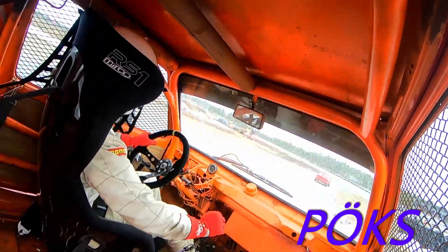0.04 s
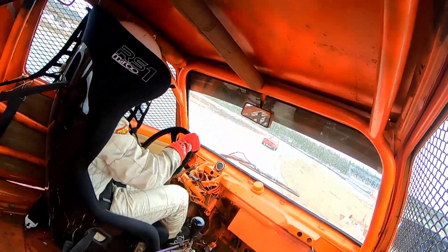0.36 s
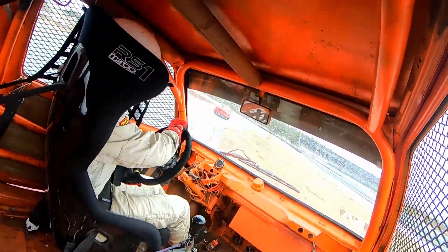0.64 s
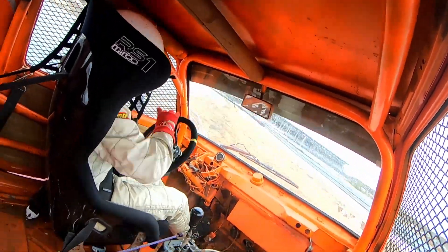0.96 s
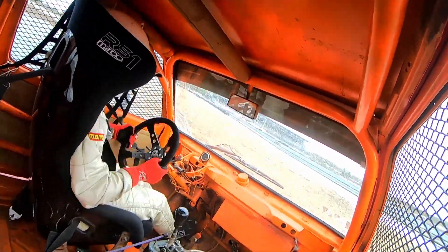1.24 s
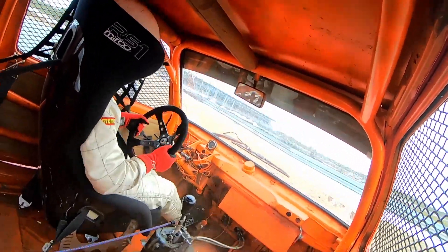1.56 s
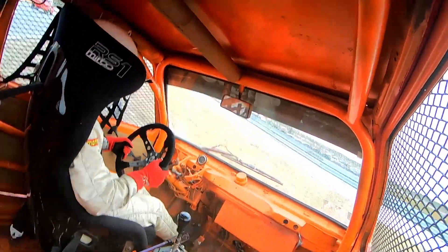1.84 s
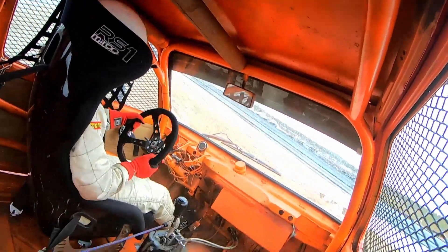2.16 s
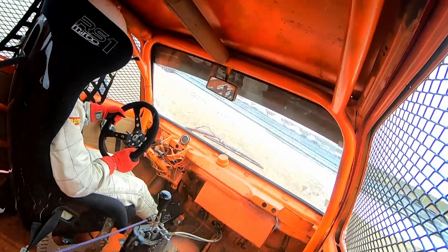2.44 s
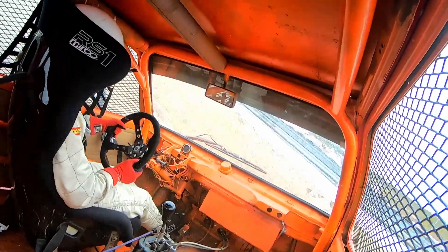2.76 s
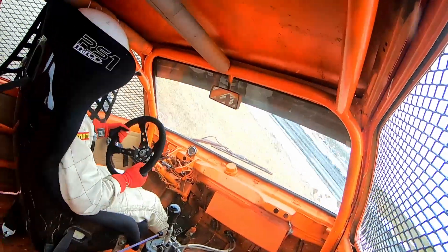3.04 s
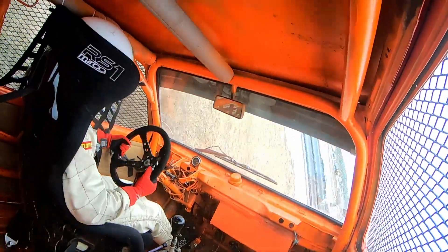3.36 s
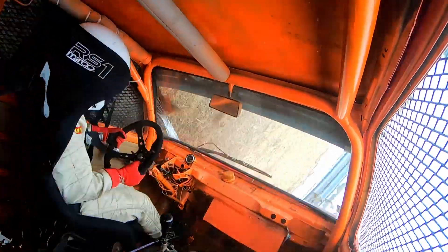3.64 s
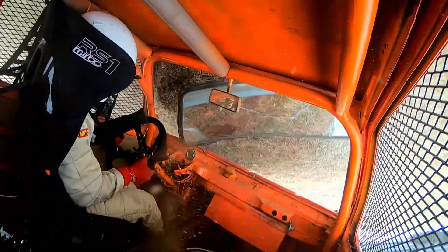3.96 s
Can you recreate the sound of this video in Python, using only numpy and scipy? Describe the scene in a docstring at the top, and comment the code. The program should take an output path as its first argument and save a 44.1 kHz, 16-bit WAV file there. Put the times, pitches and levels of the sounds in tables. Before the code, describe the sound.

A race car engine drones and sinks in pitch, heard inside the bare metal cabin. Tyres squeal briefly and a second engine fades, then gravel sprays the rumbling body, ending in a crunch of dirt and a boom.

```python
"""A race car's engine, heard inside the stripped shell as the car slides off the track and starts to tip.
Its note follows the firing rate and sinks as the car slows; a second engine drones nearby.
Stick-slip friction makes the tyres squeal briefly. Then the wheels plough loose dirt: the shell
rumbles and booms, gravel and stones set the panels ringing, and the body digs in."""
import sys
import numpy as np
from scipy import signal
from scipy.fft import rfft, irfft
from scipy.io import wavfile

SR = 44100
rng = np.random.default_rng(int(sys.argv[2]) if len(sys.argv) > 2 else 0)


def dump(signal):
    """Clip the signal to [-1, 1] and save it as 16-bit WAV at the path in sys.argv[1]."""
    limited = np.clip(np.atleast_2d(signal).T, -1, 1)
    pcm = np.round(limited * 32767).astype(np.int16)
    wavfile.write(sys.argv[1], SR, pcm)


N = 176400
T = np.arange(N) / SR

# Cylinder firing: time_s, rate_hz
FIRING_RATE = [(0, 193.7), (.22, 204.1), (.42, 174.7), (1.05, 132.4), (1.62, 100.8), (1.97, 98.55),
               (2.15, 92), (2.4, 84.1), (2.66, 72.86), (3, 75.2), (3.5, 72.18)]
# Engine fundamental: time_s, level_db
FUNDAMENTAL = [(0, -13.5), (.18, -10), (.36, -15), (.52, -8), (.62, -13), (.95, -11), (.99, -22),
               (1.7, -24), (1.92, -17), (2.12, -20), (2.45, -28.5), (2.85, -16.5), (3.3, -17.5), (3.6, -29)]
# Its octave: time_s, level_db
OCTAVE = [(0, -28.5), (1.5, -27), (1.64, -11.5), (1.97, -21.5), (2.14, -12.5), (2.3, -21.5), (2.56, -12.5),
          (2.85, -20.5), (3.5, -18.5), (4, -26)]
# Upper engine partials: firing_multiple, gain_db
OVERTONES = [(2.25, -6.5), (2.75, -0.5), (3, -1), (4, -3), (5, -9.5), (6.5, -9.5)]
# Their shared envelope: time_s, gain_db
RASP = [(0, -24), (.2, -25), (.28, -31.5), (1.2, -38), (2, -29.5), (4, -25)]
# Second engine: time_s, pitch_hz, level_db
RIVAL = [(0, 223.6, -20.5), (.5, 219.9, -21), (.7, 212.2, -27.5), (1.08, 206, -12.5), (1.22, 200.2, -21),
         (1.6, 199.2, -49)]
# Rolling noise on the hard track: time_s, level_db
ROAD = [(0, -20), (.2, -26), (.44, -23), (.55, -24), (1.1, -25.5), (2.5, -35)]
# Its spectrum: frequency_hz, gain_db
ROAD_SPECTRUM = [(290, -6), (650, 0.5), (1000, -5), (2600, -15), (5200, -30), (9500, -41.5)]
# Chassis rumble: time_s, level_db
RUMBLE = [(0, -29), (.75, -36), (1.02, -24), (1.5, -20), (1.7, -29), (1.94, -18.5), (2.4, -29), (2.85, -25),
          (3.6, -16.5), (4, -21)]
# Its spectrum: frequency_hz, gain_db
RUMBLE_SPECTRUM = [(20, -1), (36, 1), (65, 4), (120, 1), (250, -71)]
# Roar of the shell: time_s, level_db
ROAR = [(0, -22.5), (1.02, -22), (1.4, -15.5), (1.7, -16.5), (2.05, -13), (3, -18.5), (3.62, -21),
        (3.72, -15.5), (4, -17)]
# Its spectrum: frequency_hz, gain_db
ROAR_SPECTRUM = [(90, -11), (155, 2.5), (215, -1), (285, -4.5), (400, -7.5), (600, -12), (1000, -20),
                 (1400, -27), (3000, -37.5)]
# Gravel spray: time_s, gain_db
SPRAY = [(0, -37), (.44, -36), (.54, -57), (.9, -37), (1.095, -36), (1.12, -27), (1.35, -22), (1.52, -28),
         (1.7, -27), (1.82, -24.5), (1.9, -28), (2.12, -36), (2.5, -28.5), (2.8, -34), (3.05, -33.5),
         (3.36, -43), (3.61, -39), (3.69, -28), (3.8, -28.5), (3.85, -33.5), (4, -47.5)]
# Its spectrum: frequency_hz, gain_db
SPRAY_SPECTRUM = [(800, 1), (1700, 6.5), (3100, 2), (6400, -7.5), (8400, -12.5), (10000, -23),
                  (12800, -24.5), (15400, -39)]
# Panel modes rung by the spray: centre_hz, width_hz, gain_db
PANEL_MODES = [(777, 140, -4.5), (1378, 210, -11.5), (2770, 980, -15.5)]
# Tyre squeal: time_s, pitch_hz, level_db
SQUEAL = [(.25, 650, -32.5), (.42, 637, -27), (.56, 630, -29.5), (.66, 660, -22), (.72, 692, -17.5),
          (.77, 665, -25.5), (.85, 661, -23), (.9, 663, -36)]
# Stones and clods striking the body: start_s, level_db, ring_hz
STONES = [(.932, -31.5, 5530), (1.058, -30.5, 5533), (1.181, -32, 1704), (1.452, -25, 2610),
          (1.609, -24, 5000), (1.823, -20, 1500), (1.849, -30, 4400), (2.414, -27, 1994),
          (2.484, -29.5, 3600), (2.649, -22.5, 2712), (2.862, -26, 2806), (3.04, -33.5, 3305),
          (3.163, -26.5, 2920), (3.282, -27.5, 1078), (3.404, -31, 3000), (3.501, -33.5, 4916),
          (3.684, -20.5, 2883), (3.738, -19.5, 1405), (3.783, -25, 3200)]
# Bumps booming through the shell: start_s, level_db, pitch_hz
BUMPS = [(1.81, -17, 220), (1.96, -15.5, 249), (2.72, -15.5, 267.2), (2.78, -17.5, 285.4), (3.71, -25, 211),
         (3.921, -11, 187)]
# The body digging into dirt: time_s, level_db
DIG = [(3.53, -48), (3.555, -20.5), (3.6, -25.5), (3.67, -22.5), (3.705, -15), (3.79, -18), (3.9, -15.5),
       (4, -21.5)]
# Its spectrum: frequency_hz, gain_db
DIG_SPECTRUM = [(220, 0), (460, 10.5), (720, 6.5), (1150, -3), (1500, -4.5), (2000, -22), (4000, -23)]

BAND_LIMIT_HZ = 15500


def amp(db):
    return 10 ** (np.asarray(db) / 20)


def unit(x):
    return x / np.sqrt(np.mean(x ** 2) + 1e-20)


def curve(rows, column=1):
    """Linear interpolation of one table column in time."""
    rows = np.array(rows)
    return np.interp(T, rows[:, 0], rows[:, column])


def envelope(rows, column=1):
    """Amplitude envelope from a dB column, silent before its first row."""
    return amp(curve(rows, column)) * (T >= rows[0][0])


def wobble(rate_hz):
    """Low-pass noise of unit RMS: a random fluctuation."""
    hz = np.fft.rfftfreq(N, 1 / SR)
    return unit(irfft(rfft(rng.standard_normal(N)) / (1 + (hz / rate_hz) ** 4), N))


def colour(x, spectrum):
    """Minimum-phase filtering to a spectrum with steep skirts, at unit RMS."""
    hz = np.abs(np.fft.fftfreq(8192, 1 / SR)) + 1
    knots_hz, knots_db = np.transpose(spectrum)
    db = np.interp(np.log(hz), np.log(knots_hz), knots_db)
    db += 40 * np.log10(np.minimum(hz / knots_hz[0], 1))
    db -= 70 * np.log10(np.maximum(hz / knots_hz[-1], 1))
    log_gain = np.log(amp(np.maximum(db, -100)))
    response = np.exp(np.conj(signal.hilbert(log_gain)))
    taps = np.fft.ifft(response).real[:4096] * np.hanning(8192)[4096:]
    return unit(signal.oaconvolve(x, taps)[:len(x)])


def ring(x, hz, width_hz):
    """Forced response of a damped resonator, at unit RMS."""
    return unit(signal.lfilter(*signal.iirpeak(hz, hz / width_hz, SR), x))


def grains(per_s, spread_db):
    """Shot noise: independent impacts of random size."""
    size = amp(spread_db * np.minimum(rng.exponential(1, N), 5))
    return unit(size * rng.choice([-1., 1.], N) * (rng.random(N) < per_s / SR))


def phase(hz, jitter, rate_hz):
    """Phase as the integral of an unsteady frequency."""
    return 2 * np.pi * np.cumsum(hz * (1 + jitter * wobble(rate_hz))) / SR


def partial(angle, flutter_db, rate_hz):
    """A sinusoid under random amplitude modulation."""
    return unit(np.sin(angle) * amp(flutter_db * wobble(rate_hz)))


def engine(firing):
    """Periodic firing drives a fundamental and rough overtones; near idle the octave takes over."""
    rasp = sum(amp(db) * partial(k * firing, flutter_db=3, rate_hz=38) for k, db in OVERTONES)
    note = envelope(FUNDAMENTAL) * partial(firing, flutter_db=0.5, rate_hz=79)
    octave = envelope(OCTAVE) * partial(2 * firing, flutter_db=1, rate_hz=20)
    return note + octave + envelope(RASP) * rasp


def rival_engine():
    """A second engine, muffled to one wavering partial, fades with distance as it falls behind."""
    angle = phase(curve(RIVAL), jitter=0.013, rate_hz=18)
    return envelope(RIVAL, column=2) * partial(angle, flutter_db=3.5, rate_hz=19)


def road():
    """Rolling contact between tyre and track radiates broadband noise."""
    return envelope(ROAD) * colour(rng.standard_normal(N), ROAD_SPECTRUM)


def shell(firing, throb_depth=0.22):
    """Forced vibration: rough ground shakes chassis and steel shell; each firing modulates the roar."""
    rumble = envelope(RUMBLE) * colour(rng.standard_normal(N), RUMBLE_SPECTRUM)
    throb = 1 + throb_depth * np.cos(firing)
    roar = envelope(ROAR) * colour(rng.standard_normal(N) * throb, ROAR_SPECTRUM)
    return rumble + roar


def gravel(decay_s=0.021, dust_share=0.42, clump_db=1):
    """Random impacts of grit and dust excite panel modes; a weak spray thins to single ticks."""
    spray = envelope(SPRAY)
    density = spray / spray.max()
    hit_energy = grains(per_s=2800 * density, spread_db=4) ** 2 / np.sqrt(density)
    stored_energy = signal.lfilter([1], [1, -np.exp(-2 / (decay_s * SR))], hit_energy)
    strength = unit(np.sqrt(stored_energy)) + dust_share
    drive = unit(strength * rng.standard_normal(N) * amp(clump_db * wobble(rate_hz=28)))
    panels = sum(amp(db) * ring(ring(drive, hz, width), hz, 2 * width) for hz, width, db in PANEL_MODES)
    return spray * (colour(drive, SPRAY_SPECTRUM) + panels)


def tyre_squeal(octave_db=-4.5):
    """Stick-slip oscillation of rubber: the harder it squeals, the steadier its pitch."""
    level = amp(curve(SQUEAL, column=2))
    angle = phase(curve(SQUEAL), jitter=0.036 * np.sqrt(level.max() / level), rate_hz=70)
    note = partial(angle, flutter_db=1.8, rate_hz=100)
    octave = amp(octave_db) * partial(2 * angle, flutter_db=1.8, rate_hz=100)
    sliding = (T >= SQUEAL[0][0]) & (T < SQUEAL[-1][0])
    return level * sliding * (note + octave)


def stones(rise_s=0.007, t60_s=0.27, q=6, tick_db=4, fall_db_per_octave=13.5):
    """Impact excitation: each stone clatters on metal; the higher it rings, the brighter its tick."""
    out = np.zeros(N)
    for start, db, hz in STONES:
        t = T[:min(SR // 4, N - round(start * SR))]
        top_db = -fall_db_per_octave * np.log2(BAND_LIMIT_HZ / hz)
        tick = colour(rng.standard_normal(len(t)), [(hz / 2, 0), (hz, 0), (BAND_LIMIT_HZ, top_db)])
        clatter = ring(tick, hz, hz / q) + amp(tick_db) * tick
        level = np.minimum(t / rise_s, 1) * amp(db - 60 * t / t60_s)
        out[round(start * SR):][:len(t)] += unit(clatter) * level
    return out


def bumps(rise_s=0.0064, t60_s=0.53, upper_ratio=1.65, upper_db=-7.5):
    """Free vibration: knocked by ruts and banks, a large panel booms in two damped low modes."""
    out = np.zeros(N)
    for start, db, hz in BUMPS:
        t = T[:N - round(start * SR)]
        lower_phase, upper_phase = rng.uniform(0, 2 * np.pi, 2)
        lower = np.sin(2 * np.pi * hz * t + lower_phase)
        upper = amp(upper_db) * np.sin(2 * np.pi * hz * upper_ratio * t + upper_phase)
        level = np.minimum(t / rise_s, 1) * amp(db - 60 * t / t60_s)
        out[-len(t):] += unit(lower + upper) * level
    return out


def dig():
    """Granular noise: many small impacts merge into a crunch as the tipping body enters the dirt."""
    crunch = grains(per_s=620, spread_db=0.5) + 0.87 * rng.standard_normal(N)
    return envelope(DIG) * colour(crunch, DIG_SPECTRUM)


def scene():
    """Superposition of all sources in one channel; engine and shell share the firing phase."""
    firing = phase(curve(FIRING_RATE), jitter=0.0083, rate_hz=25.3)
    driving = engine(firing) + rival_engine() + road() + shell(firing)
    return (driving + gravel() + tyre_squeal() + stones() + bumps() + dig())[None]


def record(dry, ceiling=0.95):
    """Soft saturation rounds the highest peaks; a low-pass filter then limits the band."""
    limited = dry / (1 + (dry / ceiling) ** 6) ** (1 / 6)
    low_pass = signal.firwin(511, BAND_LIMIT_HZ, window=("kaiser", 9), fs=SR)
    return signal.oaconvolve(limited, low_pass[None], "same")


dry = scene()
out = record(dry)
dump(out)
```